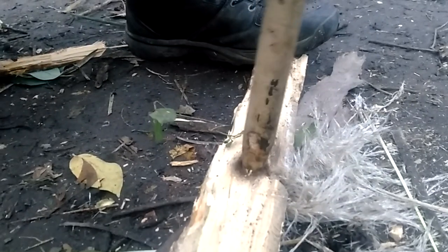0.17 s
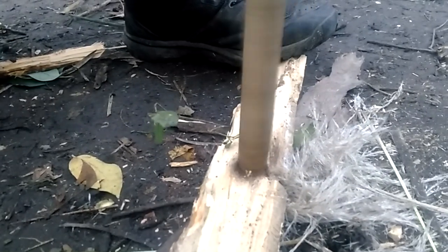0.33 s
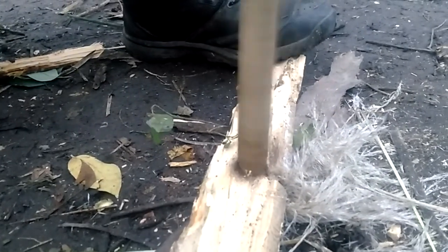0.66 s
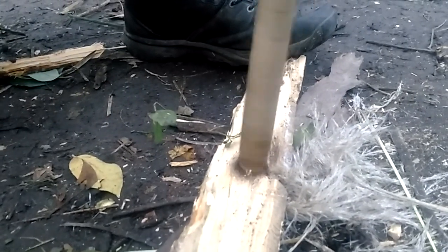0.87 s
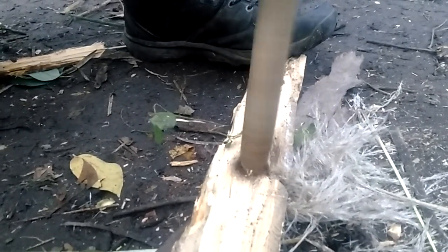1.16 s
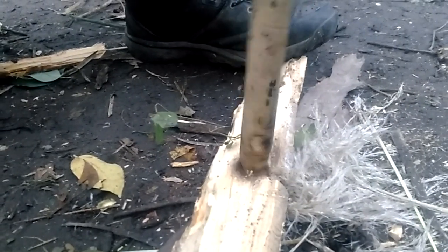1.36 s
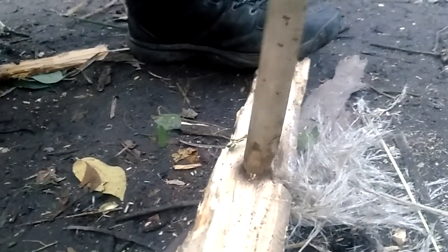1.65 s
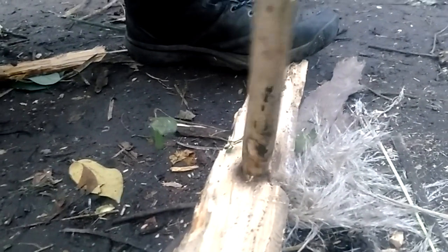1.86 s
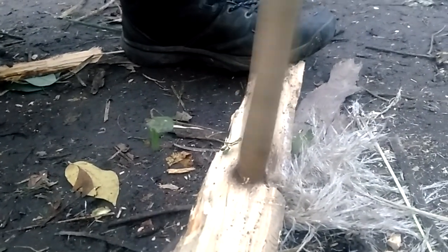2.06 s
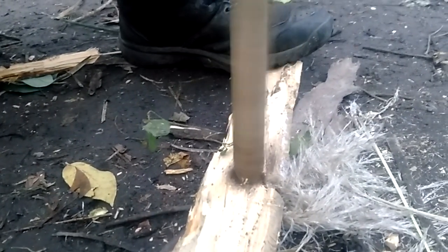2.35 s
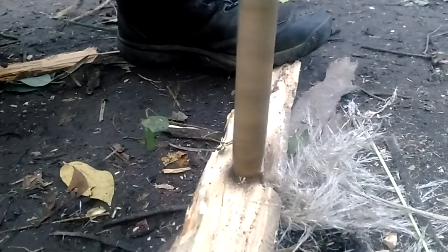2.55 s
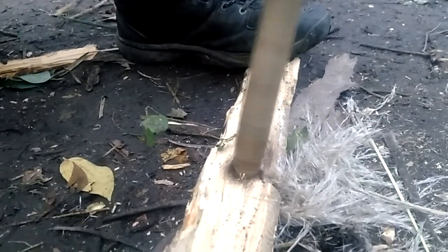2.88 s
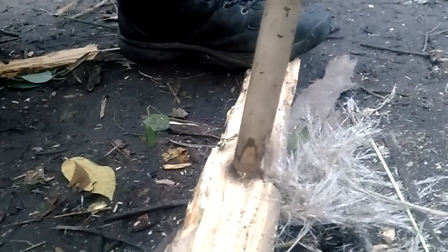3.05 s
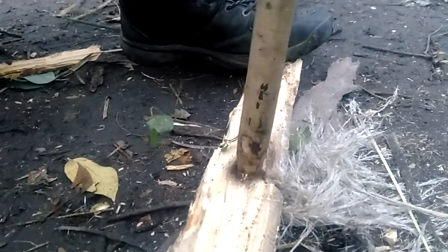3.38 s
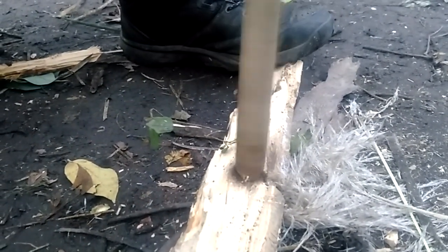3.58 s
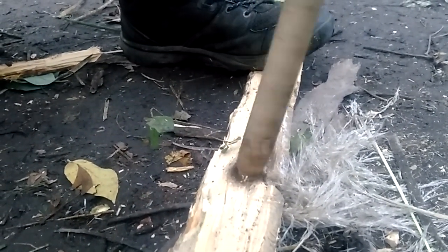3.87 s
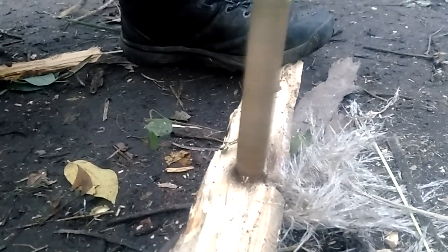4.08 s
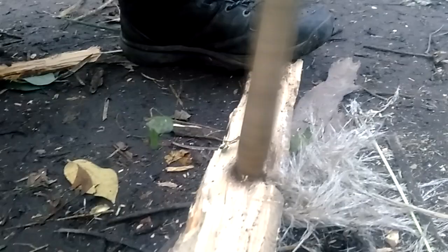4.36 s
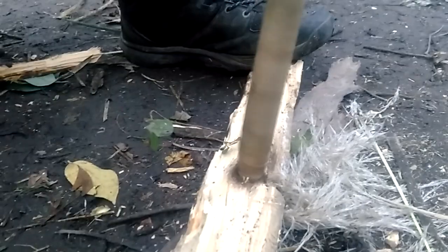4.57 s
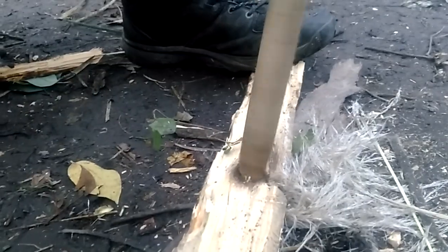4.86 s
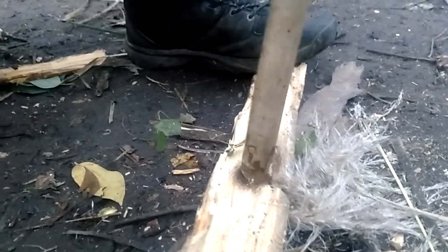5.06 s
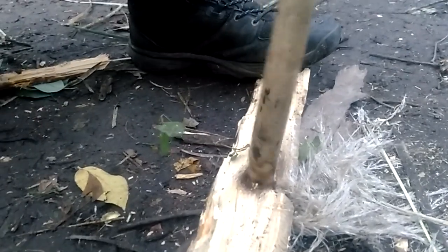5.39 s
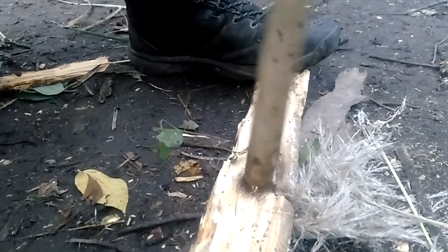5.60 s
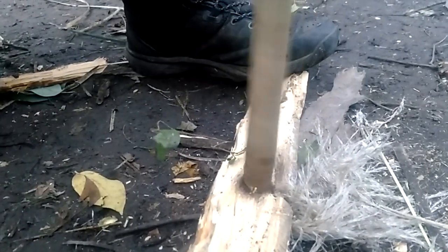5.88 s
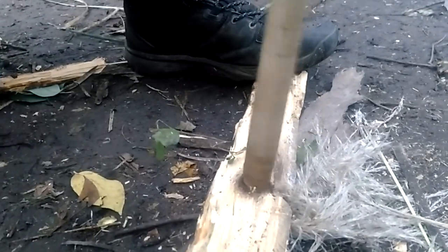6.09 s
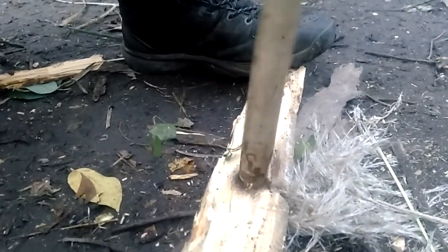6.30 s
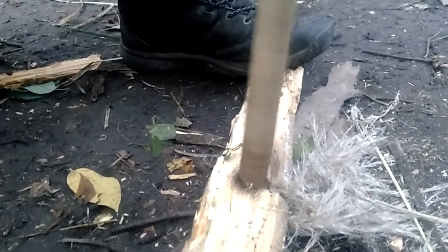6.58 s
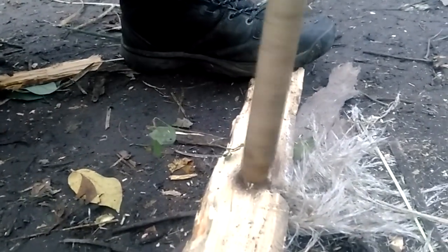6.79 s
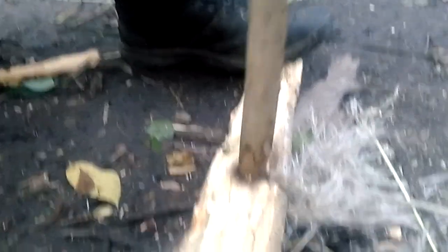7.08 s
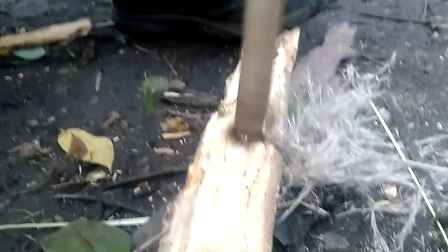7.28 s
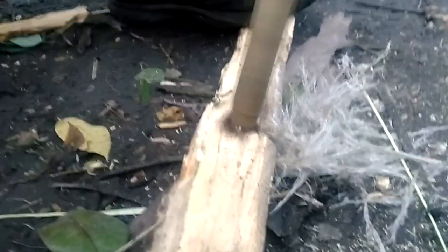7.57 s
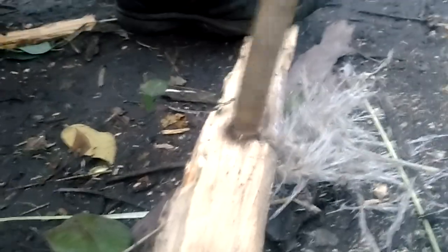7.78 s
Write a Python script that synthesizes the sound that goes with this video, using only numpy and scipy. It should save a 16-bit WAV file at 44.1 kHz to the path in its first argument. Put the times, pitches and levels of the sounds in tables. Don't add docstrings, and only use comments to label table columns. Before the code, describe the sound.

Close up outdoors, a wooden spindle turns back and forth in a dry wooden socket, a little over three strokes a second. Each stroke swells and fades as a soft, bright rasp with a woody ring, while very brief, much louder squeaks burst out near mid-stroke. A few grit snaps tick. Low distant traffic and faint air lie beneath, with barely any echo.

```python
import sys
import numpy as np
from scipy import signal
from scipy.fft import rfft, irfft, next_fast_len
from scipy.io import wavfile
from scipy.ndimage import uniform_filter1d

SR = 44100
rng = np.random.default_rng(int(sys.argv[2]) if len(sys.argv) > 2 else 0)


def to_wav(s):
    ch = np.atleast_2d(s).T
    pcm = np.round(np.clip(ch, -1, 1) * 32767)
    wavfile.write(sys.argv[1], SR, pcm.astype(np.int16))


def voltage_ratio(level):
    return 10 ** (np.asarray(level, float) / 20)


N = 350065


def squeak():
    # frequency in Hz, overtone level in dB.
    overtone_spectrum = [(2300, 11.5), (3400, 8.5), (4400, 6), (6000, 0), (6800, -15.5), (7600, -30.5),
                         (10000, -56)]
    rate_jitter, overtone_flutter_db, wander_rad, flutter_db = .016, 3.5, .55, 2.6
    onset_steepness, squareness = 1.2, 2.2
    octave, fundamental, upper, pull, weight = np.zeros((5, N)) + 1e-30
    for s, ms, hz, octave_db, fundamental_db, overtones_db, rise in binds():
        first = max(int((s - ms / 400) * SR), 0)
        last = min(int((s + ms / 400) * SR), N)
        near = np.arange(first, last)
        along = (near / SR - s) * 2000 / ms
        steepness = np.where(along < 0, onset_steepness, 1 / onset_steepness)
        swell = .5 ** (np.abs(along * steepness) ** squareness)
        force = np.hypot(voltage_ratio(octave_db), voltage_ratio(fundamental_db))
        octave[near] += voltage_ratio(octave_db) * swell
        fundamental[near] += voltage_ratio(fundamental_db) * swell
        upper[near] += force * voltage_ratio(overtones_db) * swell ** 1.66
        pull[near] += hz * (1 + rise * np.tanh(along)) * (force * swell) ** 2
        weight[near] += (force * swell) ** 2
    rate_hz = uniform_filter1d(np.maximum(pull / weight, 700), size=60) * (1 + rate_jitter * drift(90))
    phase = 2 * np.pi * np.cumsum(rate_hz) / SR
    out = fundamental * voltage_ratio(flutter_db * drift(70)) * np.sin(phase)
    out += octave * voltage_ratio(flutter_db * drift(130)) * np.sin(2 * phase + 1)

    uneven = np.clip(9.0 * fundamental / np.hypot(fundamental, octave), 0, 1)
    shares = []
    for k in range(3, 12):
        share = voltage_ratio(at_hz(overtone_spectrum, k * rate_hz))
        shares.append(share * uneven if k % 2 else share)
    total = np.sqrt(sum(share ** 2 for share in shares))
    for k, share in enumerate(shares):
        wobble = drift(47)
        level = upper * share / total * voltage_ratio(overtone_flutter_db * wobble)
        out += level * np.sin((k + 3) * phase + 2.3 * k + wander_rad * wobble)
    return np.sqrt(2) * out, upper


def binds():
    # time in seconds, length in ms, slip rate in Hz, force in dB.
    even_binds = [(.159, 6.4, 798, -38.5), (.469, 11, 853, -17), (.489, 11, 803, -25),
                  (.783, 11, 820.2, -34), (1.097, 10, 804.7, -18.5), (1.32, 16.6, 809, -23.5),
                  (1.605, 5.7, 851, -28.5), (1.613, 6, 774.6, -23), (1.911, 12.8, 802, -19.5),
                  (1.955, 12.6, 890, -34), (2.172, 12.1, 855, -15.5), (2.204, 20.6, 772.6, -19.5),
                  (2.46, 10, 868, -24.5), (2.472, 10, 813.7, -30.5), (2.768, 17, 822, -22),
                  (2.791, 15.3, 774, -21.5), (2.811, 11, 870.2, -23.5), (3.065, 6.7, 820, -39),
                  (3.677, 5.5, 852, -36.5), (4.215, 9.7, 864, -29.5), (4.509, 15, 873, -27),
                  (4.763, 12, 809, -41), (5.385, 8, 858, -41), (5.99, 9, 768.5, -35.5),
                  (6.613, 18, 825, -37), (6.69, 6.4, 779, -31), (6.674, 7.9, 823, -18.5),
                  (6.738, 20, 852, -38.5), (7.354, 18.8, 877, -43.5), (7.672, 8.9, 739, -11)]
    hard_binds = [(.14, 12, 918.4, -23), (.206, 12, 934, -31.5), (.527, 12, 939, -19.5),
                  (.831, 7, 923.5, -34.5), (1.043, 17, 948.2, -20), (1.658, 13, 906.8, -15.5),
                  (2.227, 14, 862.3, -20), (3.953, 18, 941.6, -24), (3.968, 7, 902, -25),
                  (3.98, 26, 828.8, -21), (3.997, 5, 836.2, -25), (4.009, 25, 873, -31),
                  (4.284, 6, 920.6, -32.5), (4.556, 11, 889.4, -16.5), (5.026, 13, 866, -17),
                  (5.086, 17, 874.2, -16.5), (5.643, 10, 909, -15.5), (5.653, 7, 945, -31),
                  (5.694, 17, 933, -17.5), (5.975, 9, 914.6, -31.5), (6.279, 21, 944.5, -20),
                  (6.335, 15, 871.5, -18), (7.0, 14, 901, -15), (7.061, 16, 933.5, -18),
                  (7.682, 8, 806, -13.5), (7.697, 13, 804, -23), (7.716, 9.5, 829, -15),
                  (7.746, 24, 799.5, -28), (7.779, 9, 806, -21), (7.792, 11, 925, -23)]
    light_binds = [(.194, 8, 960.8, -36), (.82, 9, 993, -29), (.775, 5.284, 900, -32.5),
                   (1.06, 15, 975, -32.5), (1.105, 7, 927.8, -24.5), (1.116, 15, 977.8, -29),
                   (1.365, 7, 1021, -37.5), (2.51, 16, 1003, -28), (2.822, 13, 936.2, -24.5),
                   (2.831, 11, 1031, -35.5), (3.37, 14, 1039, -24), (3.45, 22, 1020, -26.5),
                   (3.742, 12, 1000, -35.5), (4.271, 13, 973.8, -25), (4.531, 23, 1008, -40),
                   (4.575, 23, 996.2, -28), (5.047, 17, 958, -24.5), (5.103, 14, 1007, -28.5),
                   (5.183, 14, 963.8, -42), (5.367, 6, 897, -37.5), (5.416, 10, 985, -35.5),
                   (5.666, 11, 1033, -41.5), (6.046, 18, 971.7, -37.5), (6.628, 5, 874.4, -33.5),
                   (6.351, 11, 987.7, -28.5), (7.076, 16, 1013, -33), (7.429, 7.3, 981, -41.5),
                   (7.727, 11, 812, -23), (7.806, 25, 1006, -42)]
    # slip rate in Hz, level in dB.
    even_lean = [(780, -45), (850, -36.5), (885, -24.5)]
    # slip rate in Hz, level in dB.
    uneven_lean = [(800, -7), (880, -13.5), (945, -6.5), (985, 11.5), (1040, 9.5)]
    # time in seconds, gain on the overtones in dB.
    bite_curve = [(0, -1), (.8, 0.5), (1.1, 5.5), (1.35, -1), (1.66, -4), (2.17, 2.5), (2.8, 5),
                  (3.37, -24), (3.45, -1), (3.98, 2), (4.51, -7), (4.56, 2.5), (5.1, 1), (5.65, -1.5),
                  (6.28, -0.5), (6.34, 7), (6.65, -3), (7.07, -0.5)]
    lead_in = -6, 7, -23, -13.5, .99
    even_trail = 8, 12, -15.5, -25.5, .95
    hard_trail = 6, 11, -22, -17.5, 1.04
    light_trail = 6, 11, -22, -17.5, 1.0
    # binds, lean, trail, overtones re squeak dB, relative change of slip rate through the bind
    kinds = [(even_binds, even_lean, even_trail, -15, -.02),
             (hard_binds, uneven_lean, hard_trail, -12.5, .035),
             (light_binds, uneven_lean, light_trail, -14, .02)]
    for rows, lean, trail, edge_db, rise in kinds:
        for s, ms, hz, db in rows:
            parts = [(s, ms, hz, db, edge_db)]
            for gap_ms, part_ms, part_db, overtones_db, ratio in (lead_in, trail):
                at = s + (gap_ms + np.sign(gap_ms) * ms / 2) / 1000
                parts.append((at, part_ms, hz * ratio, db + part_db, overtones_db))
            for at, length_ms, rate_hz, force_db, overtones_db in parts:
                lean_db = at_hz(lean, rate_hz)
                octave_db = force_db - 10 * np.log10(1 + voltage_ratio(2 * lean_db))
                bite_db = np.interp(at, *np.transpose(bite_curve))
                yield at, length_ms, rate_hz, octave_db, octave_db + lean_db, overtones_db + bite_db, rise


def rasp(grit):
    # frequency in Hz, density in dB per Hz.
    scratch_spectrum = [(1500, -28.5), (2350, -9.5), (2800, -2), (3700, -4), (4350, 1), (4900, -3),
                        (6200, 1.5), (7500, -15.5), (9600, -28.5), (10600, -49), (14000, -57)]
    # frequency in Hz, width in Hz, level in dB.
    wood_modes = [(674, 86, -17), (973.4, 75, 3), (1047, 210, -4), (1330, 340, -7.5), (1405, 290, -2),
                  (1676, 446, 1.5), (1950, 63, -18.5)]
    groan_modes = [(189, 100, -4), (402, 85, 0.5), (583, 77, -12.5)]
    slow_modes = [(1114, 90, -1.5), (2978, 72, -0.5)]
    socket_modes = [(2910, 190, 1.5), (4396, 120, 1), (6080, 230, -3.5)]
    knock_modes = [(2770, 410, 0.5), (2710, 160, -10)]
    clicks_per_s, grain_db = 5000, 2.0
    scratch_gain, ring_gain, groan_gain, slow_gain, pushing = stroke_gains()
    sizes = voltage_ratio(grain_db * np.minimum(rng.exponential(1, N), 5)) * rng.choice([-1, 1], N)
    clicks = rms_one(sizes * (rng.random(N) < clicks_per_s / SR))

    scratch = patchy(coloured(clicks, scratch_spectrum), 1500, 1.4, count=7, patchy_db=2.6, rate_hz=24)
    scratch = scratch + voltage_ratio(-10.0) * modes(clicks, socket_modes, flicker_db=7.5)
    scratch = scratch * np.hypot(voltage_ratio(4.5) * scratch_gain, grit)
    ring = modes(clicks, wood_modes, flicker_db=4.5) * np.hypot(voltage_ratio(3.0) * ring_gain, voltage_ratio(2.0) * grit)
    groan = voltage_ratio(0.5) * groan_gain * modes(clicks, groan_modes, flicker_db=3)
    slow = voltage_ratio(-9.5) * slow_gain * modes(clicks, slow_modes, flicker_db=3)
    knock = voltage_ratio(8.0) * pushing * grit * modes(clicks, knock_modes, flicker_db=5.5)
    return scratch + ring + groan + slow + knock


def stroke_gains():
    # start in seconds, length in seconds, moment of top speed 0-1, rasp level in dB.
    strokes = [(0.008, 0.3, 0.46, -51), (0.313, 0.3, 0.6, -46.5), (0.65, 0.24, 0.57, -49),
               (0.906, 0.27, 0.58, -49), (1.229, 0.21, 0.51, -49.5), (1.451, 0.29, 0.6, -47.5),
               (1.784, 0.25, 0.52, -50.5), (2.009, 0.3, 0.64, -47.5), (2.326, 0.28, 0.56, -49.5),
               (2.619, 0.27, 0.58, -49), (2.966, 0.25, 0.44, -52.5), (3.289, 0.24, 0.34, -50.5),
               (3.592, 0.23, 0.48, -52.5), (3.829, 0.25, 0.55, -50), (4.115, 0.25, 0.44, -50.5),
               (4.352, 0.27, 0.57, -52), (4.665, 0.23, 0.53, -51.5), (4.922, 0.3, 0.49, -49.5),
               (5.263, 0.24, 0.41, -49.5), (5.537, 0.26, 0.46, -49), (5.878, 0.27, 0.33, -51.5),
               (6.175, 0.31, 0.48, -51), (6.566, 0.32, 0.32, -52), (6.889, 0.28, 0.46, -49.5),
               (7.248, 0.3, 0.43, -52.5), (7.595, 0.27, 0.41, -47.5), (7.847, 0.22, 0.54, -61)]
    # time in seconds, level in dB.
    lingers = [
        (.3, -78),
        (.89, -72),
        (2.95, -81.5),
        (4.65, -74.5),
        (5.5, -79),
        (6.85, -81),
    ]
    rising_power, falling_power = (2.38, 2.67), (2.17, 1.88)
    ring_db, groan_db = (1, 1), (-12.5, -16.5)
    gather_share, linger_s = .42, 0.051
    gains, t = np.zeros((5, N)), np.arange(N) / SR
    for k, (s, length_s, top, rasp_db) in enumerate(strokes):
        pull = k % 2
        near = np.arange(max(int(s * SR), 0), min(int((s + length_s) * SR), N))
        warp = np.log(.5) / np.log(np.clip(top, .15, .85))
        travel = np.clip((near / SR - s) / length_s, 0, 1) ** warp
        arc = np.sin(np.pi * travel) ** np.where(travel < .5, rising_power[pull], falling_power[pull])
        gains[:3, near] += voltage_ratio(rasp_db + np.array([[0], [ring_db[pull]], [groan_db[pull]]])) * arc
        gather = np.sin(np.pi * np.minimum(travel / gather_share, 1)) ** 2
        gains[3, near] += pull * voltage_ratio(rasp_db) * gather
        gains[4, near] = 1 - pull
    gains[0] += sum(voltage_ratio(db) * np.exp(-((t - s) / linger_s) ** 2) for s, db in lingers)
    return gains


def ticks():
    # time in seconds, peak level in dB.
    snaps = [
        (0.063, -52),
        (2.035, -56),
        (3.316, -35),
        (4.16, -52),
        (6.791, -43),
        (7.278, -54),
        (7.897, -56),
    ]
    out, t = np.zeros(N), np.arange(600) / SR
    for s, db in snaps:
        at = int(s * SR)
        puff = rng.standard_normal(600) * np.exp(-t / .004) * np.tanh(t / .001)
        out[at:at + 600] += voltage_ratio(db) * puff
    return signal.sosfilt(signal.butter(6, [600, 6800], "band", fs=SR, output="sos"), out)


def echo(x):
    level_db, t60_s, gap_s = -47, 0.29, 0.13
    t = np.arange(SR) / SR
    tail = rng.standard_normal(SR) * voltage_ratio(-60 * t / t60_s) * np.tanh((t / gap_s) ** 2)
    tail = signal.lfilter([1], [1, -.6], tail)
    return voltage_ratio(level_db) * signal.fftconvolve(x, tail / np.sqrt(np.sum(tail ** 2)))[:N]


def background():
    # frequency in Hz, density in dB per Hz.
    rumble_spectrum = [(15, -32), (25, -29.5), (65, -0.5), (91, 1), (283, -22.5), (412, -23.5), (700, -24),
                       (910, -44.5), (1540, -120)]
    # frequency in Hz, density in dB per Hz.
    hiss_spectrum = [(500, -27.5), (1000, -2), (1800, -2), (3000, -5), (6200, -3), (7500, -13.5),
                     (10000, -31), (14000, -28)]
    rumble = coloured(rng.standard_normal(N), rumble_spectrum)
    rumble = patchy(rumble, 25, 2, count=5, patchy_db=3.6, rate_hz=6)
    hiss = coloured(rng.standard_normal(N), hiss_spectrum) * voltage_ratio(-75.5 + 2 * drift(1.0))
    return rumble_gain() * rumble + hiss


def rumble_gain():
    # time in seconds, level in dB.
    traffic = [
        (0.0, -65.5),
        (1.66, -57.5),
        (3.0, -65.5),
        (5.0, -61),
        (7.94, -64),
    ]
    # time in seconds, level in dB.
    jolts = [
        (2.78, -59),
        (3.201, -66),
        (3.91, -63),
        (6.9, -56.5),
        (7.72, -51),
    ]
    rise_s, fall_s = 0.031, 0.074
    t = np.arange(N) / SR
    swells = sum(voltage_ratio(db) * np.exp(np.minimum((t - s) / rise_s, (s - t) / fall_s)) for s, db in jolts)
    return voltage_ratio(np.interp(t, *np.transpose(traffic))) + swells


def rms_one(x):
    return x / np.sqrt(np.mean(x ** 2) + 1e-20)


def at_hz(points, hz):
    curve_hz, curve_db = np.transpose(points)
    return np.interp(np.log(hz), np.log(curve_hz), curve_db)


def drift(rate_hz):
    r = np.exp(-2 * np.pi * rate_hz / SR)
    return rms_one(signal.lfilter([1], [1, -2 * r, r * r], rng.standard_normal(N + SR))[SR:])


def coloured(x, spectrum):
    size = next_fast_len(N)
    hz = np.maximum(np.arange(size // 2 + 1) * SR / size, 1)
    return rms_one(irfft(rfft(x, size) * voltage_ratio(at_hz(spectrum, hz)), size)[:N])


def resonate(x, hz, width_hz):
    r = np.exp(-np.pi * width_hz / SR)
    zeros = np.array([1, 0, -1]) * (1 - r * r) / 2
    return signal.lfilter(zeros, [1, -2 * r * np.cos(2 * np.pi * hz / SR), r * r], x)


def modes(x, rows, flicker_db):
    out = np.zeros(N)
    for k, (hz, width_hz, db) in enumerate(rows):
        ringing = resonate(resonate(x, hz, width_hz), hz, width_hz)
        out += (-1) ** k * voltage_ratio(db + flicker_db * drift(33.0)) * ringing
    return rms_one(out)


def patchy(x, low_hz, step, count, patchy_db, rate_hz):
    out = np.zeros(N)
    for k in range(count):
        hz = low_hz * float(step) ** k
        band = signal.butter(2, [hz, step * hz], "band", fs=SR, output="sos")
        out += (-1) ** k * signal.sosfilt(band, x) * voltage_ratio(patchy_db * drift(rate_hz))
    return rms_one(out)


def scene():
    tone, edge = squeak()
    drill = tone + rasp(grit=voltage_ratio(-8.5) * edge) + ticks()
    mid = drill + echo(drill) + background()
    treble = signal.butter(8, 6200, "high", fs=SR, output="sos")
    side = voltage_ratio(-12) * signal.sosfilt(treble, np.roll(mid, 400))
    return np.array([mid + side, mid - side])


def top_cut(x):
    return signal.sosfilt(signal.butter(12, 14300, fs=SR, output="sos"), x)


def record(dry):
    return top_cut(dry)


dry = scene()
out = record(dry)
to_wav(out)
```